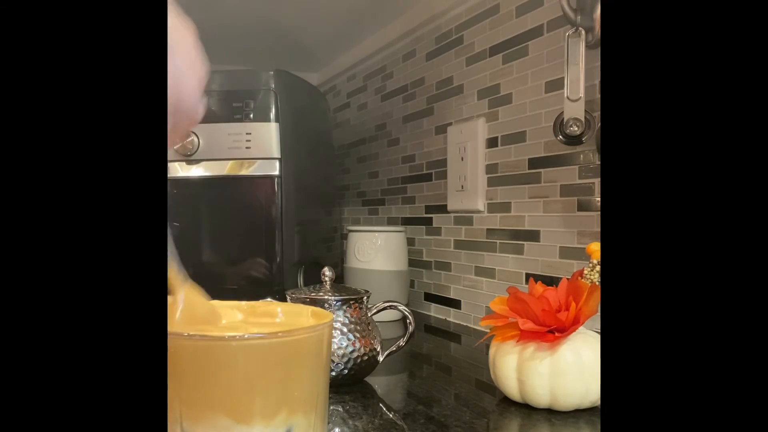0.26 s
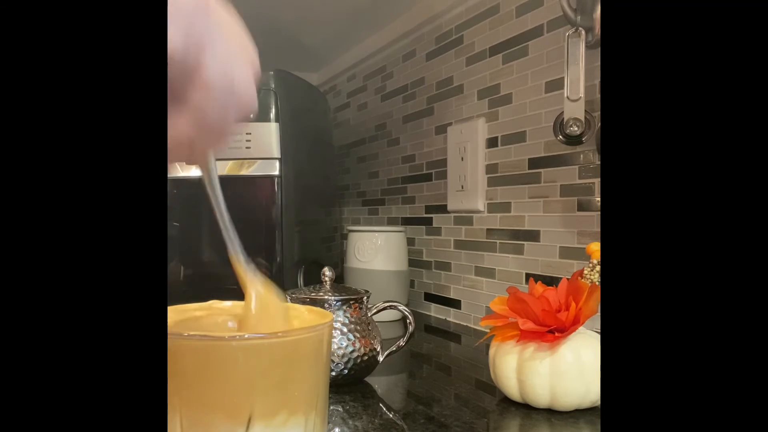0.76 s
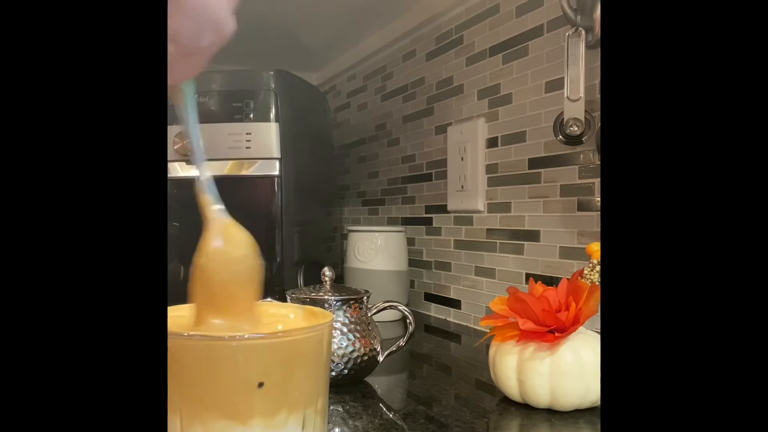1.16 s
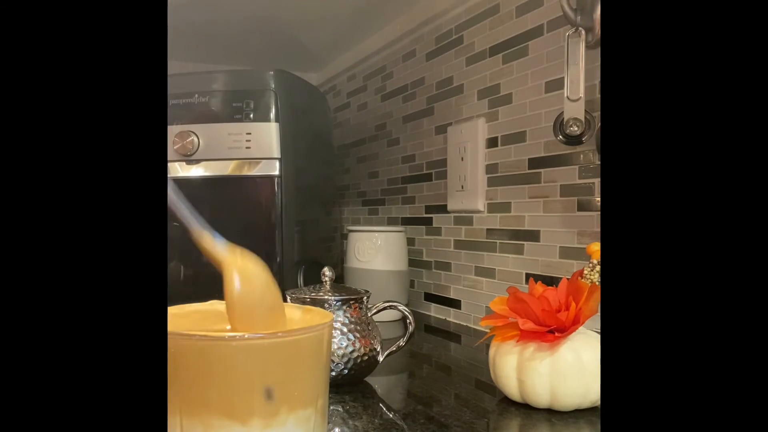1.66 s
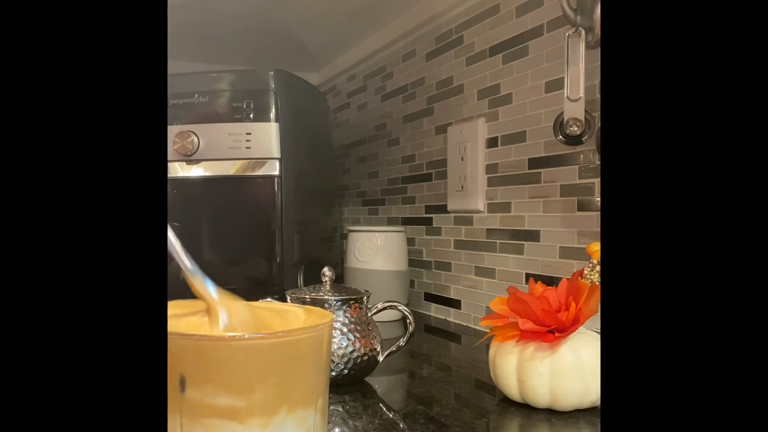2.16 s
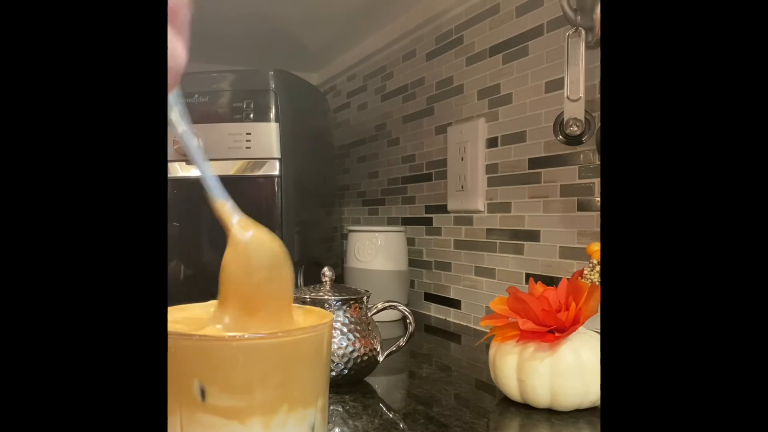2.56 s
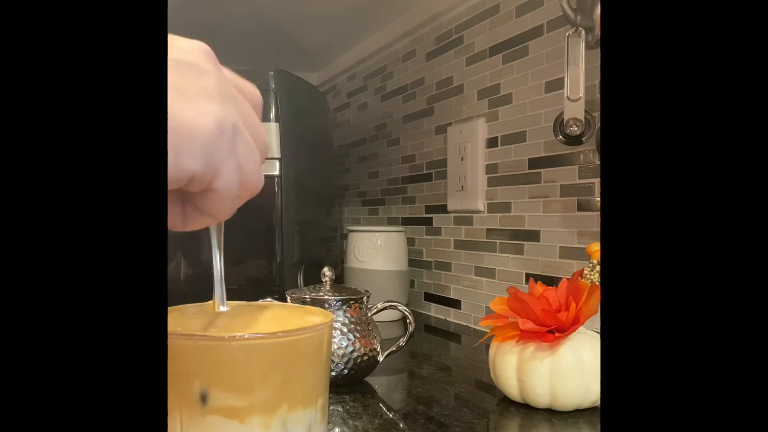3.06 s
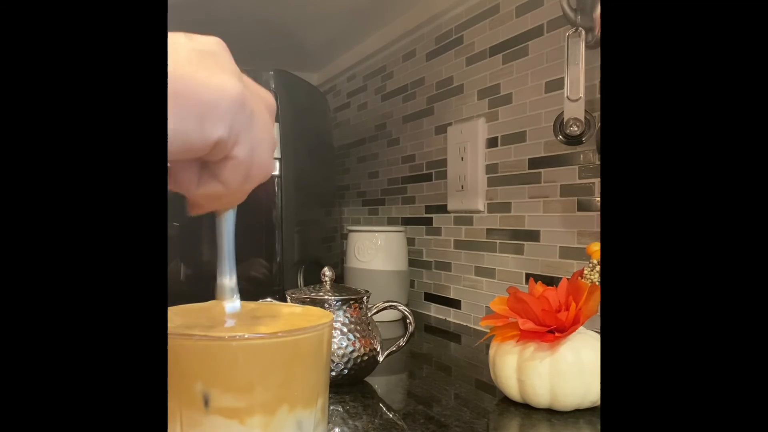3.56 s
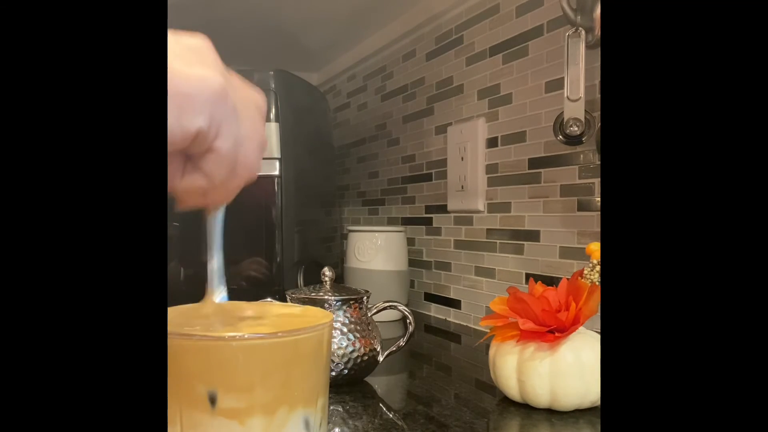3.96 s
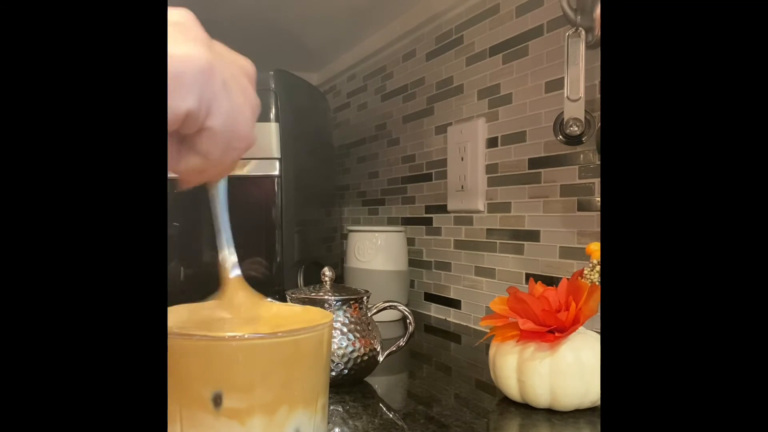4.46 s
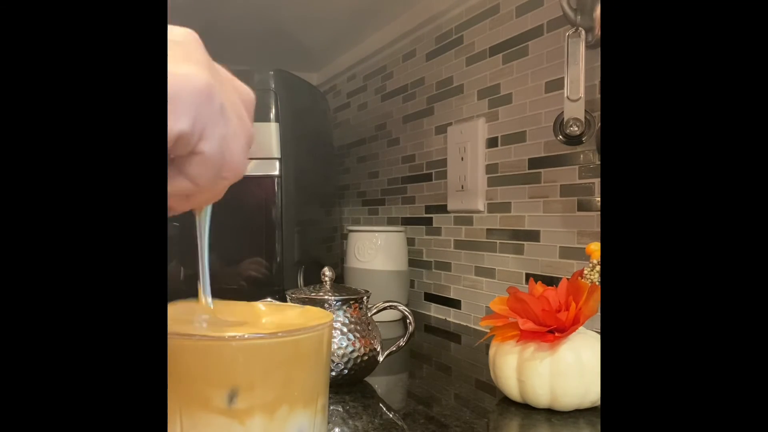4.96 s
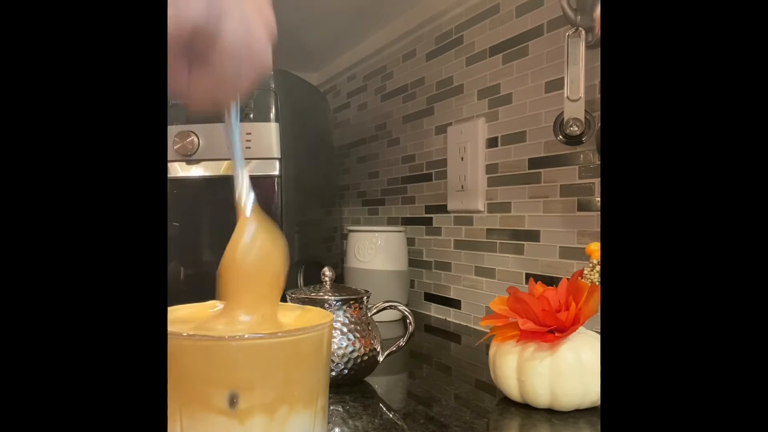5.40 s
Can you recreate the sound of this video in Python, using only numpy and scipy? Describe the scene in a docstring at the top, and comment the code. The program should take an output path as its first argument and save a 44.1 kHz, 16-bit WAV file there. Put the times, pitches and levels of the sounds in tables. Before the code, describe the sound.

A phone microphone near a filled glass catches uneven scooping with a spoon: wet hollow knocks of ice under foam, small low thuds of the glass on the counter, and damped high clinks. The stirring then becomes a regular rapid beat, about seven strong clinks a second with ice knocks between, foam hissing. It stops briefly, ends with one duller scoop. Soft room air and a low hum continue.

```python
"""A metal spoon stirs thick foam into an iced drink in a glass, close to a phone on a kitchen counter.
From start to end an appliance hums; spoon and ice knock under the foam as short falling plops, made by delaying
low notes most, and the spoon clinks on the glass: a choked cluster of tones, a noise tick and a faint rim.
First come seven scoops with rubbing crackle, then quick beating on wall and ice in turn, in which tiny noise
bursts make the foam fizz, and at last one more scoop. Counter, tiles and room answer the blows throughout."""
import sys
import numpy as np
from scipy import signal
from scipy.fft import rfft, irfft
from scipy.io import wavfile
from scipy.ndimage import uniform_filter1d

SR = 44100
rng = np.random.default_rng(int(sys.argv[2]) if len(sys.argv) > 2 else 0)


def unload_wav(signal):
    """Save mono or channel-first audio to the path in sys.argv[1] as 16-bit WAV at rate SR, clipped to [-1, 1]."""
    wavfile.write(
        sys.argv[1],
        SR,
        np.round(np.clip(np.atleast_2d(signal).T, -1, 1) * 32767).astype(np.int16),
    )


N = 248405

# spoon on the glass wall: t/s, middle ring level/dB, low ring relative to it/dB,
# top ring relative to it (brightness)/dB, plop level/dB, contact length factor
SPOON_CLINKS = [(0.2214, -46.5, -22, -12, -43, 0.84), (0.232, -44.5, -3.5, -41, -44, 0.6),
                (0.276, -52, -6, -36, -52.5, 0.39), (0.3196, -35, -10, -21.5, -49.5, 0.16),
                (0.6344, -29.5, -3.5, -14, -34, 0.58), (0.6671, -28, -7, -27, -38.5, 0.66),
                (0.701, -38.5, -6, -29.5, -34.5, 0.5), (0.7207, -50, -4, -24, -46, 0.5),
                (0.7416, -30.5, -6, -29, -34.5, 0.6), (0.8186, -42.5, -14, -35, -53, 0.31),
                (0.8333, -31.5, -8.5, -6.5, -31.5, 0.926), (0.8449, -48.5, 2, -18, -50, 0.3),
                (0.9178, -57.5, -1, -23, -59.5, 0.32), (0.965, -72, 3, 2, -38.5, 0.88),
                (1.1977, -47, 1, -8.5, -32.5, 0.66), (1.22, -52, -12, -35, -69, 0.39),
                (1.241, -59, -13, -42, -44, 0.7), (1.251, -41, -11, -34, -35, 0.55),
                (1.274, -43.5, -14, -18, -40, 0.66), (1.324, -54.5, -15, -19, -47.5, 0.55),
                (1.5727, -40.5, -1.5, -17.5, -33, 0.33), (1.6368, -55.5, -7, -11, -47, 0.86),
                (1.7049, -42, -17, -16.5, -31, 0.7), (1.7122, -38.5, -9, -33, -38.5, 0.6),
                (1.9255, -28, 6, -15.5, -29, 0.63), (1.966, -39, -9.5, -14.5, -42, 0.85),
                (2.263, -38, -3.5, -19, -37.5, 0.86), (2.2927, -25, -7.5, -19, -34, 0.64),
                (2.3453, -32, -6.5, -19.5, -35.5, 0.61), (2.8885, -31.5, -26, -3, -25.5, 0.61),
                (2.9597, -45, -11.0, -8, -31.5, 1.44), (3.232, -30, -0.5, -25, -37, 0.66),
                (3.3005, -44.5, -5, 2, -34.5, 0.87), (3.3756, -28, -0.5, -14.5, -37.5, 0.44),
                (3.5078, -31, 4.5, -7, -31.5, 0.62), (3.5345, -33.5, -27, -22, -45, 0.9),
                (3.5591, -38.5, -19, -4, -40, 0.89), (3.649, -38, 8, -7.5, -28.5, 0.65),
                (3.69, -38, -2, -27.0, -62, 1.4), (3.699, -43.5, 8.5, -4.0, -34.5, 1.4),
                (3.794, -26.5, 4, -1, -33.5, 0.77), (3.825, -53, 12, -16.5, -54.5, 0.75),
                (3.845, -47, 0, 6, -31, 1.7), (3.9309, -25.5, 0, 0, -39.5, 0.58),
                (4.08, -21.5, -5, -5.5, -38.5, 0.61), (4.12, -57, 0, -7, -45.5, 0.68),
                (4.2224, -21.5, 2, 0.5, -34, 0.77), (4.341, -64.5, 0.0, -7, -46, 0.62),
                (4.3782, -18.5, -5.5, -11, -41, 0.68), (4.422, -56, -5.0, -7.0, -41.5, 1.0),
                (4.496, -63.5, -10, -11, -45.5, 0.48), (4.5448, -26.5, -2.5, -27.5, -39.5, 0.53),
                (4.5663, -50.5, -6.5, -22, -48, 0.76), (4.6419, -44.5, 1.5, -15.5, -40, 0.82),
                (4.7106, -38.0, 0, -9, -35, 0.74), (4.793, -51.5, 1.5, -8, -43.5, 0.76),
                (4.879, -39, -19, -4, -32, 0.96), (4.936, -52.5, 1, -10, -45.5, 2.3),
                (4.9733, -21, 0.2, -4, -40, 1.3), (5.1294, -19.5, -2.5, -8.5, -34, 1.1),
                (5.257, -64.5, 6, -6.5, -52, 0.91), (5.5434, -52, 5, -34, -47, 0.64),
                (5.6069, -42.5, -21, -18, -42.5, 0.32)]
# spoon and ice knocking under the foam: t/s, plop level/dB, centre f/Hz, clack relative to the plop/dB,
# tick relative to the plop (hardness)/dB, level of the glass's thud/dB
FOAM_KNOCKS = [(0.108, -47.5, 726, -2, -22, -53.5), (0.1284, -30, 624, -7, -14.5, -36.5),
               (0.154, -24, 693, -5.5, -28, -25), (0.236, -42, 510, -13, -17, -37),
               (0.267, -44, 674, 5, -11, -43), (0.341, -43.5, 563, -2, -9.5, -47),
               (0.4365, -39, 510, -5, -51, -39), (0.468, -59.5, 950, 10, -31, -55),
               (0.593, -47, 630, -4, -25.5, -67), (0.6757, -21.5, 560.0, -10, -23, -31),
               (0.7041, -35, 620, -10.5, -12, -55), (0.7126, -23.0, 620, -11, -12, -42),
               (0.725, -30.5, 509, -5, -25, -60), (0.775, -29.5, 526, -6, -21, -38),
               (0.81, -49, 610, -12, -9, -57), (0.8216, -36.5, 474, -6, -19, -34.5),
               (0.9821, -28, 514, -13, -20, -29), (1.09, -52.5, 616, -2, -20, -62),
               (1.116, -50.5, 693, -3, -23, -58), (1.1588, -27.5, 498, -3.5, -19, -37.5),
               (1.1828, -37, 484, -9, -14, -64), (1.269, -42, 606, -12, -12, -48),
               (1.317, -38, 550, -5, -12.5, -43), (1.388, -43.5, 660, 4, -14, -52),
               (1.5744, -30.5, 890, -28, -11.5, -37), (1.6518, -31.5, 636, -8, -19, -49),
               (1.685, -43, 560, -17, -35.5, -37), (1.697, -50, 610, -1, -25.5, -52),
               (1.761, -53, 654, -4, -13, -55.5), (1.7727, -31.5, 540, -9.5, -16.5, -38),
               (1.928, -30.5, 956, -2.5, -27, -48), (2.002, -36, 684, -1.5, -30, -41.5),
               (2.041, -49, 596, -9, -25, -60), (2.073, -51.5, 560, -10, -15, -53),
               (2.104, -51.5, 730, 1.5, -8, -52), (2.173, -35.5, 540, -7, -42, -42),
               (2.233, -54, 515, -15.5, -5, -63), (2.246, -37.5, 550, -13, -30, -57),
               (2.282, -34, 640, -1, -11, -69), (2.311, -39, 560.0, -2, -25, -49),
               (2.3732, -34, 755, -14, -37.0, -49), (2.392, -39.5, 636, -3.5, -34, -49),
               (2.417, -53, 694, 3, -26, -58), (2.443, -55, 710, 0, -21, -60),
               (2.4838, -33.5, 609, -8.5, -44.5, -40.5), (2.8262, -32.5, 734, -17, -4.5, -39),
               (2.878, -33, 593, -7.5, -7.5, -51), (2.884, -33.5, 450, -17, -25, -54),
               (2.989, -41, 503, -9, -11, -40), (3.006, -29, 526, -12.5, -21, -36.5),
               (3.0274, -36.5, 765, -9, -18, -58), (3.234, -46, 900, 8, -10, -58),
               (3.287, -47, 710, 3, -25, -43), (3.3133, -30, 546, -22, -25, -35),
               (3.377, -43, 888, 9, -16, -56), (3.402, -51, 605, 1, -14, -45),
               (3.51, -39.5, 907, 8, 3, -59), (3.568, -32, 464, -2, -24, -36.5),
               (3.651, -37, 908, 7, -9, -51), (3.7091, -29, 702, -5.5, -10, -43),
               (3.8509, -27.5, 540, -6.5, -17, -38), (3.994, -38.5, 770, -1, -5, -39),
               (4.0041, -33.5, 586, -2.5, -14, -44), (4.1467, -25, 687, -3, -14.5, -38),
               (4.211, -41.5, 660, -3, -13, -63), (4.297, -31.5, 840, -0.5, -15.0, -47),
               (4.304, -29, 577, -4, -14.5, -43), (4.4513, -29, 636, -11, -15, -39.5),
               (4.469, -41.5, 650.0, 0, -16, -45), (4.7346, -24.5, 578, -6, -13, -36),
               (4.8501, -28, 650, -13, -48, -54), (4.865, -45, 507, -17, -35, -39.5),
               (4.8844, -30, 562, -18, -42.5, -29.5), (5.0057, -30.5, 630, -15, -9.5, -40),
               (5.038, -28, 774, -4.5, -17.5, -33), (5.105, -44, 750, -1, -6, -62),
               (5.185, -44.5, 613, 3, -25.0, -44), (5.2002, -29, 620, -8.5, -16, -45),
               (5.329, -55, 696, -2, -24, -58), (5.5361, -32, 623, -18, -10.5, -40.5),
               (5.56, -43.5, 580, -7, -15, -46.0), (5.583, -39, 594, 0.5, -9, -46),
               (5.6204, -32, 537, -16.5, -41.0, -37)]
HIT, LEAD = 4096, 512  # samples given to one blow, and samples of run-up before it
PLOP_LAG_S = .003  # a plop follows its contact


def undb(db):
    """Turn decibels into a gain."""
    return 10 ** (np.asarray(db) / 20)


def bins(size):
    """List the frequencies in Hz of the spectrum of a sound with this many samples."""
    return np.arange(size // 2 + 1) * SR / size


def colour(points, hz):
    """Read the gain at the given frequencies off an outline of (Hz, dB) points."""
    f, db = np.transpose(points)
    return undb(np.interp(np.log(hz + 1), np.log(f), db))


def blow(x, db):
    """Give a short sound the energy that 10 ms at this level would have."""
    energy = np.mean(np.sum(x ** 2, axis=-1))
    return x * undb(db) * np.sqrt(SR / 100 / energy)


def add(out, x, s):
    """Mix a short stereo sound in at a time in seconds."""
    i = int(round(s * SR))
    a, b = max(i, 0), min(i + x.shape[1], N)
    if b > a:
        out[:, a:b] += x[:, a - i:b - i]


def port_noise(size, apart_hz, steepness=1.0):
    """Make noise at two microphone ports: alike in the bass, unrelated above apart_hz."""
    mid, side = rfft(rng.standard_normal((2, size)))
    share = np.minimum(bins(size) / apart_hz, 1) ** steepness
    return irfft((mid + np.outer([1, -1], share * side)) / np.sqrt(1 + share ** 2), size)


def walk(rate):
    """Wander slowly and smoothly at random, with this many new goals a second."""
    k = int(SR / rate)
    steps = np.repeat(rng.standard_normal(N // k + 1), k)
    return 9.9 * uniform_filter1d(uniform_filter1d(steps, k), k)[:N]


def crackle(rate, grain_s, spread_db):
    """Scatter sudden bursts of uneven strength in time, each dying away within a grain."""
    starts = rng.random(N) < rate / SR
    bursts = starts * undb(spread_db * np.minimum(rng.exponential(size=N), 3))
    # the tiny offset keeps the filter from running down to zero
    return signal.lfilter([1], [1, -np.exp(-1 / (grain_s * SR))], bursts + 1e-18)


def appliance(air_db=-53):
    """A steady, slightly wavering hum of a few pure tones over soft room air made of noise."""
    # steady tones of the appliance: f/Hz, rms level/dB
    hum_tones = [(88.8, -46), (177.6, -62.5), (312, -65.5), (525, -66), (1066, -72), (1770, -77.5)]
    # colour of the still air in the kitchen: f/Hz, relative level per Hz/dB
    air_colour = [(25, -22), (50, -16), (80, 0), (125, 0), (200, -2), (300, -5), (520, -4.5), (800, -8),
                  (1020, -7), (1250, -15), (1800, -19), (2500, -27), (4000, -39), (6000, -40), (9000, -44),
                  (13000, -46), (16000, -54)]
    t = np.arange(N) / SR
    hum = 0
    for hz, db in hum_tones:
        strength = np.sqrt(2) * undb(db + 0.14 * walk(3.1))
        hum = hum + strength * np.sin(2 * np.pi * hz * t + 0.051 * walk(2.7))
    air = irfft(rfft(port_noise(N, apart_hz=1440)) * colour(air_colour, bins(N)), N)
    return hum + air / np.std(air) * undb(air_db + 0.73 * walk(0.56))


def kitchen(x, near_db=-11, near_s=0.011):
    """Quick reflections from counter and tiles, then the room's tail, whose bands fade at their own pace."""
    # the kitchen's reverberation: f/Hz, level relative to the sound sent in/dB, time to fade by 60 dB/s
    room_bands = [(144, -19.5, 0.91), (265, -6, 0.22), (360, -5.5, 0.14), (482, -10, 0.11),
                  (1000, -11.5, 0.36), (2000, -13, .45), (3670, -11.5, 0.33), (6960, -20, 0.4),
                  (11500, -15, 0.22), (15400, -24.5, .16)]
    size = SR // 2
    t, hz = np.arange(size) / SR, bins(size)
    noise, response = rfft(port_noise(size, apart_hz=1400)), 0
    centres = np.log(np.array(room_bands)[:, 0])
    for (_, db, t60), corner in zip(room_bands, np.eye(len(room_bands))):
        # each band is a triangle that reaches to its neighbours
        band = np.interp(np.log(hz + 1), centres, corner)
        # silent for 3.6 ms, then swelling for as long again
        fade = undb(-60 * t / t60) * np.clip(t / 0.0036 - 1, 0, 1)
        response = response + irfft(noise * band, size) * undb(db) * fade / np.sqrt(np.sum(fade ** 2))
    near = np.exp(-t / near_s) * (t > .002)
    response = response + port_noise(size, apart_hz=1520) * undb(near_db) * near / np.sqrt(np.sum(near ** 2))
    return signal.fftconvolve(x, response, axes=1)[:, :N]


def fizz(rate=5000, spread_db=4, grain_s=0.00059, shaken_db=-31, settle_s=0.043):
    """Beaten foam: tiny bubbles burst and merge into a bright wash, which flares after each clink and settles."""
    # colour of the foam's crackle: f/Hz, relative level per Hz/dB
    foam_colour = [(1200, -3.5), (2200, 2), (4000, 6.5), (5500, 12), (8300, 3.5), (10000, 5), (13000, -4),
                   (16000, -26)]
    beating_s = (3.17, 5.2)  # start and end of the quick beating
    beaten_db, fade_s = -61.5, 0.026  # level of the beaten foam; its swell and fade
    t = np.arange(N) / SR
    outside = np.abs(t - np.clip(t, *beating_s))
    beaten = undb(beaten_db) * np.exp(-outside / fade_s)
    shaken = sum(undb(db + shaken_db) * (t > s) * np.exp(-np.abs(t - s) / settle_s)
                 for s, db, *_ in SPOON_CLINKS)
    grains = crackle(rate, grain_s, spread_db)
    wash = irfft(rfft(grains * port_noise(N, apart_hz=5870)) * colour(foam_colour, bins(N)), N)
    return wash / np.std(wash) * np.hypot(beaten, shaken)


def swirl(x, low_db=0.7, high_db=2, rate=12, split_hz=7000):
    """The spoon opens and closes the foam as it goes round: the lower and upper hiss swell unevenly."""
    low = signal.sosfilt(signal.butter(1, split_hz, fs=SR, output="sos"), x)
    lower, upper = (w / np.std(w) for w in (walk(rate), walk(rate)))
    return low * undb(low_db * lower) + (x - low) * undb(high_db * upper)


def vigour(s):
    """Strength of the stirring in dB: each stroke swells, holds and dies away."""
    # seven scoops, a spell of quick beating, one more scoop: start t/s, end t/s, vigour/dB
    spoon_strokes = [(0.15, 0.271, -50.5), (0.662, 0.806, -46.5), (1.176, 1.292, -48.5), (1.6, 1.79, -58.5),
                     (1.973, 2.023, -59), (2.257, 2.35, -51.5), (2.85, 3.026, -63.5), (3.287, 5.227, -56.5),
                     (5.564, 5.606, -44.5)]
    rise_db_per_s, fall_db_per_s = 457.5, 172.5
    return np.max([db - rise_db_per_s * np.maximum(start - s, 0) - fall_db_per_s * np.maximum(s - end, 0)
                   for start, end, db in spoon_strokes], axis=0)


def grit(rate=2600, stir_db=0.5, drag_db=-16, drag_s=0.0037, grain_s=0.00062, spread_db=7.5):
    """Fine crackle of spoon and ice rubbing; it thickens in the moment before each knock."""
    # colour of rubbing ice: f/Hz, relative level/dB
    rub_colour = [(200, 5), (450, 24), (1000, 14), (2500, 15), (4000, 10), (5200, 7.5), (6800, 7.5),
                  (8500, -38), (12000, -13.5), (16000, -16.5)]
    t = np.arange(N) / SR
    stirring = undb(vigour(t) + stir_db)
    blows = [(s, db) for s, db, *_ in FOAM_KNOCKS] + [(s + PLOP_LAG_S, db) for s, *_, db, _ in SPOON_CLINKS]
    dragging = sum(undb(db + drag_db) * np.exp(-np.abs(t - s + drag_s) / drag_s) for s, db in blows)
    slips = 0
    for strength, per_s in ((stirring, rate), (dragging, 10 * rate)):
        grains = crackle(per_s, grain_s, spread_db)
        slips = slips + strength * grains / np.sqrt(np.mean(grains ** 2))
    tone = colour(rub_colour, bins(N))
    return irfft(rfft(slips * port_noise(N, apart_hz=2940)) * tone / np.sqrt(np.mean(tone ** 2)), N)


def cubes(hz, lowest_hz=1150, octaves=1.837, width_hz=260, plain=0.93, count=4):
    """The few short resonances of whichever ice cubes are hit, as a response over frequency."""
    centres = lowest_hz * 2 ** (octaves * (np.arange(count) + rng.random(count)) / count)
    return plain + np.sum(1 / (1 + 2j * (hz - centres[:, None]) / width_hz), axis=0)


def plop(db, centre_hz, clack_db, lowest_hz=260, slow_cycles=1.7, octaves=0.54, clack_s=0.0034,
         rattle=0.19, rattle_s=0.0046):
    """A knock heard through bubbly liquid: the low notes arrive last, so it falls in pitch within a few ms."""
    # colour of the clack of ice: f/Hz, relative level/dB
    clack_colour = [(700, -16), (1350, 3), (1700, 6), (2400, 4), (3100, -1.5), (4200, 1.5), (6500, -16),
                    (13000, -54)]
    port_lag_s = .0001  # the drink's sound reaches the left port this much later
    t, hz = np.arange(HIT) / SR, bins(HIT)
    cycles = slow_cycles * np.exp(0.195 * rng.standard_normal())
    # every frequency is late by the same number of its own cycles; the centre arrives on time
    lateness = cycles * (np.log(hz + 1) - hz / centre_hz)
    delay = np.exp(-2j * np.pi * (lateness + hz * LEAD / SR + rng.random()))
    shape = np.exp(-.5 * (np.log2((hz + 1) / centre_hz) / octaves) ** 2)
    # a small glass radiates no deep bass
    shape = shape / np.sqrt(1 + (lowest_hz / (hz + 1)) ** 10)
    # ice cubes scatter part of the wave on its way out
    scatter = 1 + rattle * rfft(port_noise(HIT, apart_hz=1340) * np.exp(-t / rattle_s)) / 2
    ports = np.exp(-1j * np.pi * np.outer([1, -1], hz) * port_lag_s)
    body = irfft(shape * delay * scatter * ports)
    burst = port_noise(HIT, apart_hz=1620) * np.exp(-t / clack_s)
    clack = irfft(rfft(burst) * colour(clack_colour, hz) * cubes(hz) * delay)
    return blow(body, db) + blow(clack, db + clack_db)


def churn(count=170, above_db=3, spread_db=3, centre_hz=640, clack_db=-8):
    """Small random plops of shifting ice and foam, whose strength follows the stirring."""
    out = np.zeros((2, N))
    times = (np.arange(count) + rng.random(count)) * N / SR / count
    for s, (size, pitch) in zip(times, rng.standard_normal((count, 2))):
        db = vigour(s) + above_db + spread_db * np.tanh(size)
        add(out, plop(db, centre_hz * np.exp(.3 * pitch), clack_db), s - LEAD / SR)
    return out


def thud(db, hz=270, t60=0.041, rise_s=0.0027, mat_db=-0.5):
    """The whole glass bounces on the counter: one low, short note."""
    t = np.arange(HIT) / SR
    # the pitch varies a little from thud to thud
    varied_hz = hz * np.exp(.055 * rng.standard_normal())
    note = np.sin(2 * np.pi * varied_hz * t) * undb(-60 * t / t60) * (1 - np.exp(-t / rise_s))
    return blow(np.array([note, note]), db + mat_db)


def knocks(wall_clack_db=-2):
    """Each blow, on ice or wall or both, sends a plop through the drink and bumps the glass on the counter."""
    # centre of a clink's plop at 0 dB; weaker ones sound higher
    wall_plop_hz, octaves_per_db = 529, .012
    # the thud under a clink with a 0 dB plop, and its growth in dB per dB of plop
    thud_at_0_db, thud_growth = -15.5, 0.73
    out = np.zeros((2, N))
    ice = [(s, db, hz, clack_db, thud_db) for s, db, hz, clack_db, _, thud_db in FOAM_KNOCKS]
    wall = [(s + PLOP_LAG_S, db, wall_plop_hz * 2 ** (-octaves_per_db * db), wall_clack_db,
             thud_at_0_db + thud_growth * db) for s, *_, db, _ in SPOON_CLINKS]
    for s, db, hz, clack_db, thud_db in ice + wall:
        add(out, plop(db, hz, clack_db, lowest_hz=269.6), s - LEAD / SR)
        add(out, thud(thud_db), s)
    return out


def hollow(x):
    """Knocks set the drink's hollow cavity ringing briefly: narrow resonances are added to the sound."""
    # hollow resonances of the drink's cavity: f/Hz, width/Hz, level/dB
    cavity_bands = [(432, 50, -1), (507, 57, -0.5), (670, 120, -15), (1036, 46, -7), (1315, 24, -2.5)]
    ringing = (undb(db) * signal.lfilter(*signal.iirpeak(hz, hz / width, fs=SR), x)
               for hz, width, db in cavity_bands)
    return x + sum(ringing)


def rim(count=9):
    """The rim stands clear of the drink and sings on faintly after each clink, in close partials that beat."""
    # what rings on in the dry rim, for the low, middle and top cluster:
    # f/Hz, level relative to its cluster/dB, time to fade by 60 dB/s
    low_rim = [(3980, -25, .24), (4290, -26, .24)]
    middle_rim = [(6540, -29, .26), (6930, -25, 0.33), (7200, -29, .3), (7300, -31.5, .3)]
    top_rim = [(11500, -21, .26), (11750, -22, .26), (12700, -26.5, .22)]
    spread = .022  # share by which foam on the rim scatters the pitch of the partials
    out, t = np.zeros((2, N)), np.arange(2 * HIT) / SR
    for s, db, low_db, bright_db, _, _ in SPOON_CLINKS:
        for modes, cluster_db in ((low_rim, db + low_db), (middle_rim, db), (top_rim, db + bright_db)):
            for hz, mode_db, t60 in modes:
                offset, phase, port = rng.standard_normal((3, count, 1))
                partials = np.sin(2 * np.pi * (hz * (1 + spread * offset) * t + phase))
                # each partial is louder at one port than at the other
                note = (1 + np.outer([1, -1], port) / 2) @ partials
                add(out, blow(note * np.exp(-np.log(1000) * t / t60), cluster_db + mode_db), s)
    return out


def touches(count=110, graze_db=-7, spread_db=4, ice_length=1.13):
    """List every contact (s, low, middle, top ring dB, tick dB, edge dB, length): clinks, ice, random grazes."""
    # rings of a contact on ice, for the low, middle and top cluster: level relative to its tick/dB
    ice_ring_db = (-1.5, -6, -27.5)
    # a clink's tick: level under a 0 dB ring, dB per dB of ring, dB per dB of brightness
    tick_at_0_db, tick_growth, tick_per_brightness = -16, 0.5, 0.43
    # treble edge of a clink's tick (dB, dB per dB of brightness) and of a tick on ice (dB)
    clink_edge_db, edge_per_brightness, ice_edge_db = 10.5, 0.76, -4.5
    wall = []
    for s, db, low_db, bright_db, _, length in SPOON_CLINKS:
        tick_db = tick_at_0_db + tick_growth * db + tick_per_brightness * bright_db
        edge_db = clink_edge_db + edge_per_brightness * bright_db
        wall.append((s, db + low_db, db, db + bright_db, tick_db, edge_db, length))
    ice = [(s - PLOP_LAG_S, db + hard_db) for s, db, _, _, hard_db, _ in FOAM_KNOCKS]
    times = (np.arange(count) + rng.random(count)) * N / SR / count
    grazes = zip(times, vigour(times) + graze_db + spread_db * np.tanh(rng.standard_normal(count)))
    return wall + [(s, *(db + np.array(ice_ring_db)), db, ice_edge_db, ice_length)
                   for s, db in [*ice, *grazes]]


def bounce(x, length, gap_s=.0013, again_db=-4):
    """The spoon lands twice; a longer contact has a later and stronger second touch."""
    lag = int(gap_s * length * rng.uniform(0.54, 0.8) * SR)
    second = np.pad(x, ((0, 0), (lag, 0)))[:, :x.shape[1]]
    return x + undb(again_db / length ** 2) * second


def ring(modes, length, rise_s, scatter_db=2, split=0.011, split_db=-9, count=7, detune=.004):
    """One cluster of glass modes; ice and foam against the wall split off stray, quickly damped partials."""
    t = np.arange(HIT) / SR
    stray = [(f * (1 + split * rng.standard_normal()), db + split_db, t60 / 2, port)
             for f, db, t60, port in rng.choice(modes, count)]
    hz, db, t60, port = np.vstack([modes, stray]).T[:, :, None]
    # each place of contact weights and tunes the modes a little differently
    size, shift, start = rng.standard_normal((3, len(hz), 1))
    phase = 2 * np.pi * hz * (1 + detune * shift) * t + 1.88 * start
    fade = undb(db + scatter_db * size - 60 * t / (t60 * length)) * (1 - np.exp(-t / rise_s))
    return np.array([np.sum(fade * np.sin(phase + side * port / 2), axis=0) for side in (1, -1)])


def clinks(tick_s=0.0093, crack_s=0.00042, crack_db=8,
           low_rise_s=0.0021, middle_rise_s=0.00039, top_rise_s=0.00018):
    """Each touch of the spoon gives a choked ring and a hard tick of noise; returns both."""
    # the filled glass, three clusters of choked modes: f/Hz, relative level/dB,
    # time to fade by 60 dB before stretching/s, phase between the microphone ports/rad
    low_modes = [(3020, -12, .015, -1), (3690, -9, .03, -2.4), (3860, -4, .02, -2), (3940, 0, .027, -1.6),
                 (4010, -10, .014, -2), (4355, 0, .026, -2.3), (4750, -11, .025, -2.4)]
    middle_modes = [(6330, -3, .013, 0), (6520, -1, .016, .3), (6800, 0, .02, .9), (6970, -2, .022, 1.1),
                    (7200, -11, .014, .3), (7640, -13, .025, -.3)]
    top_modes = [(11090, -9, .018, -.3), (11330, 0, .03, -1.1), (11530, 0, .03, -.9),
                 (11850, -9, .016, -.7), (12170, -13, .024, -.7)]
    # colour of the contact tick: f/Hz, relative level/dB
    tick_colour = [(100, -54), (400, -10), (1200, -2.5), (2400, -6), (2900, 3.5), (3400, -1.5), (4600, 0),
                   (5200, -3.5), (5800, 0), (7500, -11.5), (8500, -6), (9600, -9), (12400, -7.5),
                   (14500, -15), (16500, -26.5)]
    edge_from_hz, edge_full_hz = 8400, 8800  # where the tick's treble edge sets in
    # stretch of the modes' decay at a plain touch, and its growth with contact length
    stretch, length_power = 1.1, .75
    rings, ticks = np.zeros((2, 2, N))
    t, hz = np.arange(HIT) / SR, bins(HIT)
    for s, low_db, middle_db, top_db, tick_db, edge_db, length in touches():
        length = np.clip(length, .3, 2)
        clusters = ((low_modes, low_db, low_rise_s), (middle_modes, middle_db, middle_rise_s),
                    (top_modes, top_db, top_rise_s))
        for modes, db, rise_s in clusters:
            choked = ring(modes, stretch * length ** length_power, rise_s)
            add(rings, blow(bounce(choked, length), db), s)
        # a sharp crack on top of a slower fade
        fade = np.exp(-t / (tick_s * length)) + undb(crack_db) * np.exp(-t / crack_s)
        tick = np.roll(port_noise(HIT, apart_hz=15000) * fade, LEAD, axis=1)
        tone = colour(tick_colour, hz) * colour([(edge_from_hz, 0), (edge_full_hz, edge_db)], hz)
        add(ticks, blow(irfft(rfft(bounce(tick, length)) * tone), tick_db), s - LEAD / SR)
    return rings, ticks


def scene():
    """Mix the glass and drink, their reflections, the fizz and the hum."""
    rings, ticks = clinks()
    drink = hollow(undb(-2.0) * knocks() + churn() + grit())
    # the glass wall rings straight at the phone, while the ticks spread through the kitchen
    room = kitchen(undb(-2.0) * drink + undb(-4.5) * rings + undb(-0.5) * ticks)
    return drink + rings + undb(1.5) * ticks + room + rim() + swirl(fizz()) + appliance()


def record(dry):
    """The phone cuts the top: a steep filter removes what lies above 16 kHz."""
    return signal.sosfilt(signal.ellip(8, .2, 70, 16000, fs=SR, output="sos"), dry)


dry = scene()
out = record(dry)
unload_wav(out)
```